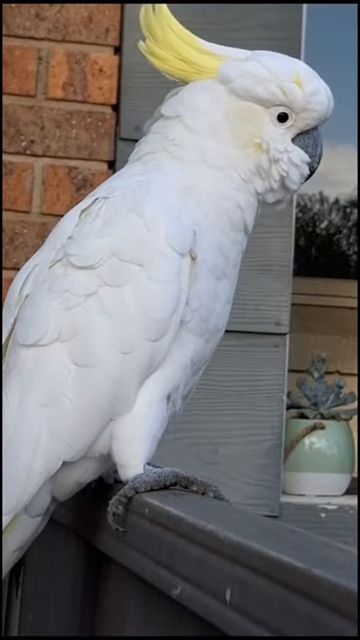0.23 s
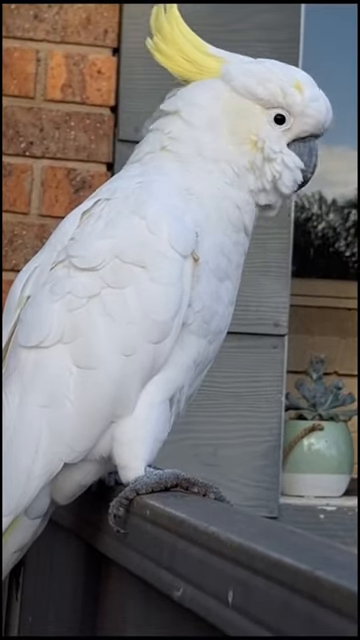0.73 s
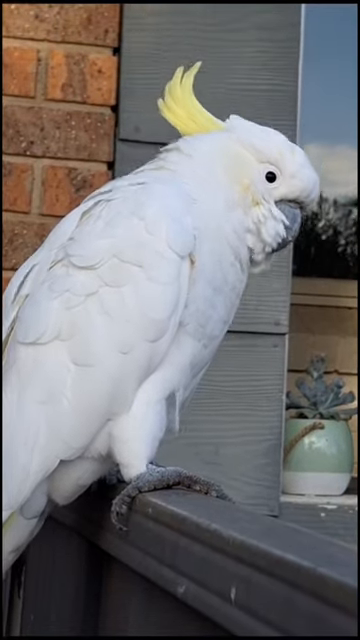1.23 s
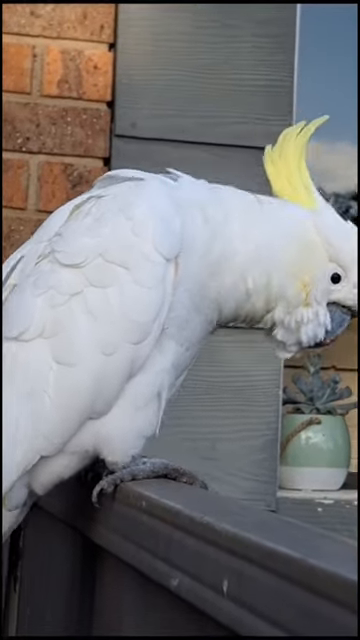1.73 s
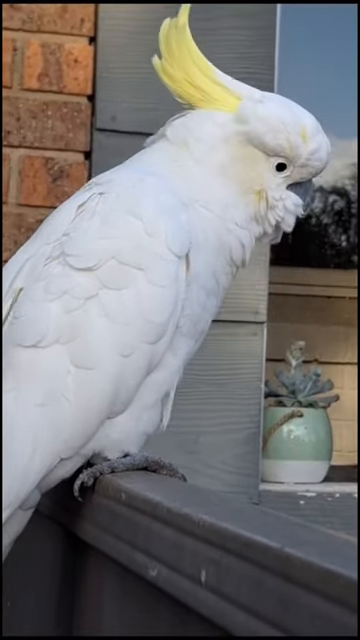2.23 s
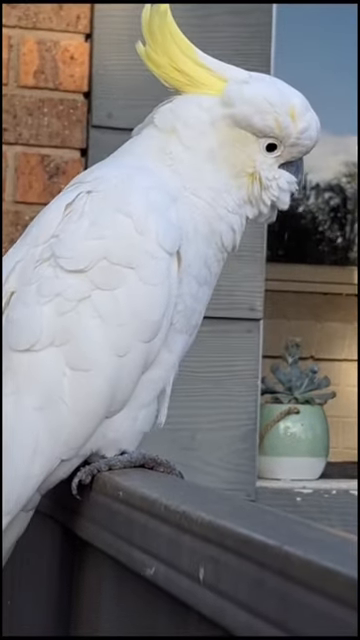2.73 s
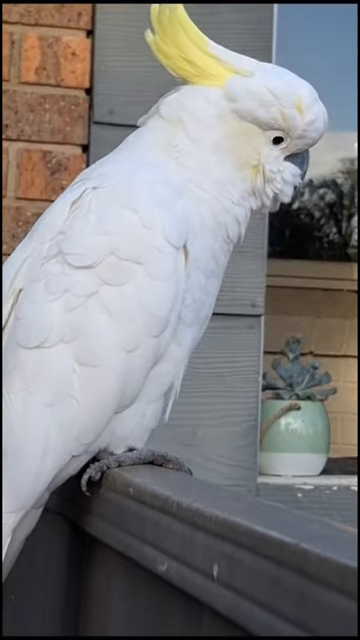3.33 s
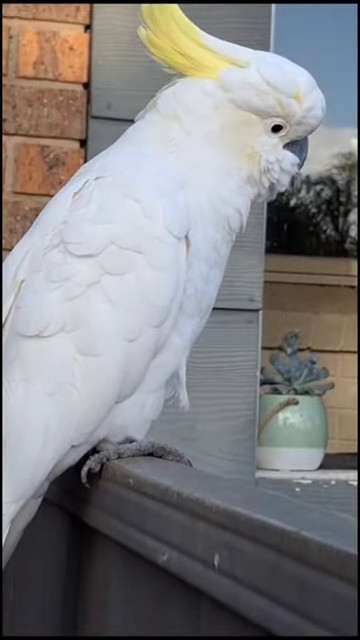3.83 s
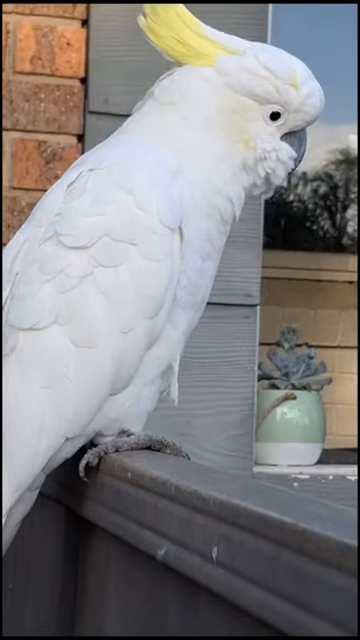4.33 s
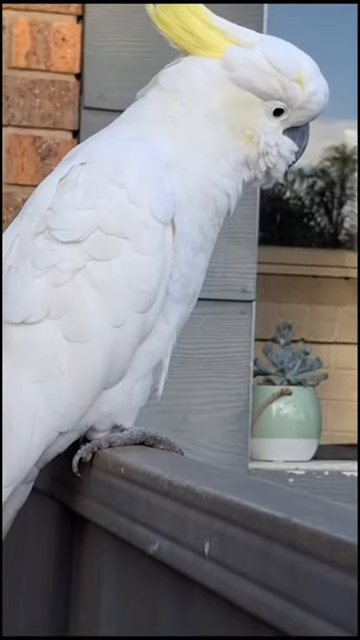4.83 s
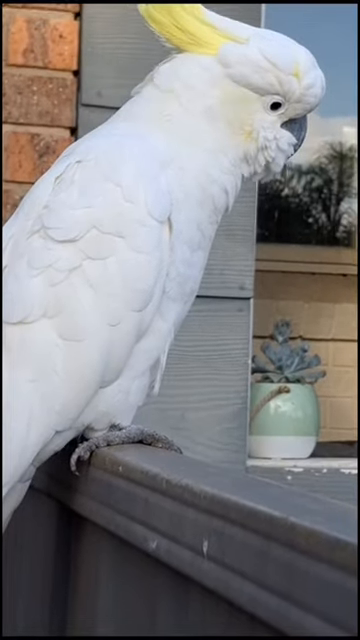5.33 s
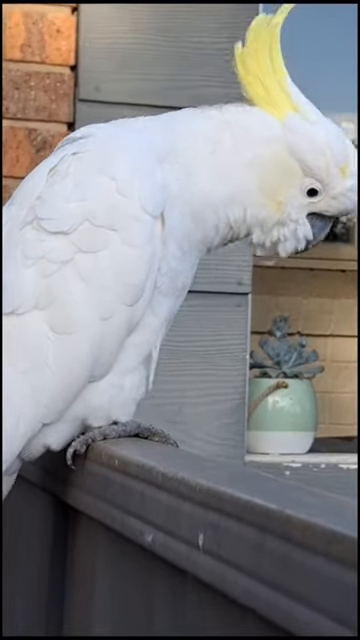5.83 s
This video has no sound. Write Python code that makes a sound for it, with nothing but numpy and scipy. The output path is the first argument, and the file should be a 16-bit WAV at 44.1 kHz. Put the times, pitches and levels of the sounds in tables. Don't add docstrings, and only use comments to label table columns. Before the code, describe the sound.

A cockatoo close by on a railing gives a faint crackling croak and a soft hoarse rasp. After a pause come two short loud calls: a harsh creak, then a clearer squawk that arches up and down. Soft low rail thumps and feather rubs accompany it. Behind are a quiet rumble, far traffic, hissing leaves, a faint motor drone and tiny bird chirps. Close stereo pickup outdoors, with only a brief reflection from the wall.

```python
import sys
import numpy as np
from scipy import signal
from scipy.fft import rfft, irfft, next_fast_len
from scipy.io import wavfile
from scipy.ndimage import uniform_filter1d, map_coordinates

SR = 44100
rng = np.random.default_rng(int(sys.argv[2]) if len(sys.argv) > 2 else 0)


def unload_wav(signal):
    wavfile.write(
        sys.argv[1],
        SR,
        np.round(np.clip(np.atleast_2d(signal).T, -1, 1) * 32767).astype(np.int16),
    )


def attenuation_scalar(level_db):
    decades = np.asarray(level_db, float) / 20
    return 10 ** decades


N = 268701
TIME = np.arange(N) / SR

# frequency in Hz, density in dB per Hz.
RUMBLE_SPECTRUM = [(12, -47.5), (20, -17), (35, -8.5), (65, 1), (85, 1), (156, -15), (200, -11.5),
                   (260, -36), (440, -120)]
# frequency in Hz, density in dB per Hz.
TRAFFIC_SPECTRUM = [(71, -35), (120, -4.5), (157, -8), (260, -3), (412, -9.5), (456, -11), (849, -15),
                    (1140, -17.5), (2500, -24.5), (3250, -57), (5500, -120)]
# frequency in Hz, density in dB per Hz.
LEAF_SPECTRUM = [(710, -34.5), (1200, -10), (1630, -6.5), (2420, -3), (3160, -2.5), (4940, -1), (5800, -4),
                 (7810, -2.5), (8970, -6.5), (12300, -7), (15300, -13)]
# frequency in Hz, left-right likeness 0-1.
COHERENCE = [(40, 0.5), (120, 0.76), (300, 0.97), (1000, 0.86), (3000, 0.188), (8000, 0.036)]
# time in seconds, rise in dB.
RUMBLE_SWELLS = [(0, 5), (.54, -0.5), (.85, 7), (1.27, 8), (1.58, 6), (2.3, 8), (2.7, 6), (2.95, 6.5),
                 (3.66, 4.5), (4.06, 2.5), (4.46, 4.5), (4.95, 3.5), (5.3, 6), (5.55, 2), (6.03, 12.5)]
# time in seconds, level in dB, left-right difference in dB.
TRAFFIC_PASSING = [(0, -61.5, 1.5), (.75, -63.5, 2.5), (1.4, -56, 1), (2.0, -61.5, 2), (2.4, -58.5, 0),
                   (3.2, -59, -3.5), (3.8, -59.5, -1), (4.9, -62.5, 0.5), (6.09, -62.5, 0)]
# time in seconds, strength in dB.
BREEZE_STRENGTH = [(0.0, -63), (0.29, -61.5), (0.54, -60.5), (0.95, -58.5), (1.08, -57.5), (1.61, -55),
                   (1.95, -57.5), (3.26, -56), (3.49, -58), (4.34, -62.5), (6.09, -62.5)]
# centre in seconds, length in seconds, start in Hz, end in Hz, level in dB.
FAR_CHIRPS = [(1.048, 0.076, 2350, 2250, -69.5), (2.432, 0.035, 2490, 2450, -62),
              (2.536, 0.037, 2500, 2446, -61), (3.22, 0.049, 3000, 3000, -58),
              (4.111, .12, 2390, 2700, -67.5), (4.303, .067, 3150, 3060, -65), (4.37, .04, 3180, 3000, -61),
              (4.384, 0.1, 3890, 4000, -66), (4.46, 0.067, 4200, 4120, -67),
              (4.497, .069, 3300, 3060, -62.5), (4.508, 0.056, 4000, 3780, -66),
              (4.542, 0.084, 2800, 2800, -66.5), (4.696, 0.029, 3900, 3970, -58),
              (5.18, .03, 3620, 3630, -68.5), (5.43, .03, 2800, 2800, -65), (5.829, .04, 3950, 3880, -67),
              (5.861, 0.033, 5300, 5500, -59), (5.869, 0.02, 4350, 4200, -52),
              (5.913, .03, 4150, 4050, -54), (6.008, .04, 4170, 4250, -66)]
# start in seconds, end in seconds, start in Hz, end in Hz, level in dB.
MOTOR_LINES = [
    (2.03, 2.203, 268, 260, -58),
    (2.156, 2.272, 210, 228, -50.5),
    (2.257, 2.75, 230, 237, -55.5),
    (2.79, 3.028, 242, 246.5, -50.5),
    (2.323, 2.574, 319, 324.4, -55),
    (2.717, 2.974, 332, 341, -57),
    (4.655, 4.837, 271.6, 226, -54.5),
    (4.925, 5.47, 252, 258.8, -60.5),
    (5.123, 5.71, 206.5, 208.8, -57),
]
# centre in seconds, length in seconds, resonance in Hz, width in Hz,
# level in dB.
BRUSH_STROKES = [
    (1.07, 0.035, 540, 1000, -55.5),
    (1.274, 0.065, 304, 260, -47.5),
    (1.86, 0.14, 1450, 1500, -60),
    (3.709, 0.047, 600, 700, -48),
    (4.053, 0.074, 2060, 2100, -57),
    (4.712, 0.11, 3500, 6600, -57.5),
    (5.933, 0.088, 2150, 4320, -56),
]
# start in seconds, peak in dB, frequency in Hz, left-right difference in dB.
RAIL_KNOCKS = [
    (0.297, -46, 67.4, -8),
    (0.881, -39, 57, 3),
    (1.169, -43, 55.7, 3),
    (1.207, -34.5, 61.9, 2),
    (1.27, -36, 52, -2),
    (2.279, -38, 67.3, 0),
    (3.693, -34, 136, 1),
    (3.734, -34.5, 80, 1.5),
    (6.03, -38, 70, 0),
]

# time in seconds, peak in dB.
CROAK_SNAPS = [
    (1.233, -39),
    (1.2415, -32),
    (1.2485, -32),
    (1.2555, -26),
    (1.2645, -25.5),
    (1.268, -30),
    (1.2745, -26),
    (1.283, -25),
    (1.2905, -30.5),
    (1.2985, -34),
]
# time in seconds, peak in dB.
CREAK_SNAPS = [(2.9905, -30), (2.9997, -18), (3.0086, -17), (3.0177, -12), (3.0272, -8.5), (3.0424, -11),
               (3.0454, -9), (3.0574, -7), (3.0654, -8.5), (3.0726, -7), (3.0924, -8.5), (3.1015, -12)]
# time in seconds, level in dB, beak opening 0-1.
RASP_COURSE = [
    (1.383, -46, 1),
    (1.41, -37, 0.23),
    (1.445, -35, 0.64),
    (1.475, -32, 0.87),
    (1.52, -34, 0.55),
    (1.55, -35.5, 0.52),
    (1.582, -48, 0.5),
]
# time in seconds, pitch in Hz, level in dB, beak opening 0-1.
ARCH_COURSE = [
    (3.22, 434, -23, 0.4),
    (3.245, 462, -19, 1),
    (3.289, 544, -20.5, 0.38),
    (3.307, 623, -26, 0.87),
    (3.33, 690.6, -25.5, 0.1),
    (3.371, 561, -21, 0.65),
    (3.39, 425.4, -20, 1),
    (3.403, 319, -22.5, 1),
    (3.421, 288, -31, 1),
]
# frequency in Hz, width in Hz, gain in dB.
CROAK_MODES = [(450, 87, -16), (890, 110, -2.5), (1396, 44, -1), (2230, 360, 0.5), (2700, 490, -3),
               (3300, 260, -7)]
# frequency in Hz, width in Hz, gain in dB.
CREAK_MODES = [(664, 260, -11), (1330, 230, -14.5), (2250, 170, 3.5), (3500, 370, -8), (4250, 370, -13)]
# frequency in Hz, width in Hz, gain in dB.
RASP_SHUT_MODES = [(900, 490, -10.5), (1530, 170, -9), (2205, 38, 8.5), (2800, 330, -9)]
# frequency in Hz, width in Hz, gain in dB.
RASP_OPEN_MODES = [(1340, 370, -11), (1890, 130, -3.5), (2380, 150, -6), (2800, 150, -5.5),
                   (3020, 630, -10.5)]
# frequency in Hz, width in Hz, gain in dB.
ARCH_SHUT_MODES = [(1190, 860, -9), (1926, 204, 5), (2700, 1600, -10.5), (3890, 640, -6)]
# frequency in Hz, width in Hz, gain in dB.
ARCH_OPEN_MODES = [(815, 350, -11), (1570, 150, -8.5), (2140, 243, 3), (3300, 1500, -9.5),
                   (4200, 320, -10.5)]
# frequency in Hz, left-right difference in dB.
BIRD_PAN = [(300, -0.5), (700, -2), (1280, 0), (2360, -4.5), (4360, -2)]
# frequency in Hz, lead of the left port in seconds.
BIRD_LEAD = [(600, 0.00011), (1400, 0.00009), (2300, 0.000066), (4400, 0.000063)]
# frequency in Hz, time to fall 60 dB in seconds.
WALL_DECAY = [(200, 0.2), (2000, 0.19), (6000, 0.034)]


def unit(x):
    return x / np.sqrt(np.mean(x ** 2) + 1e-20)


def along(points, hz):
    f, v = np.transpose(points)
    return np.interp(np.log(hz + 1), np.log(f + 1), v)


def curves(rows):
    s, *columns = np.transpose(rows)
    gate = uniform_filter1d(1. * (TIME > s[0]) * (TIME < s[-1]), size=200)
    return [np.interp(TIME, s, column) for column in columns], gate


def wobble(rate):
    knots = rng.standard_normal(int(N * rate / SR) + 4)
    return map_coordinates(knots, [TIME * rate])


def ramp(start, end, attack, release):
    rise = np.minimum((TIME - start) / attack, (end - TIME) / release)
    return np.sin(np.pi / 2 * np.clip(rise, 0, 1)) ** 2


def filtered(x, response):
    m = next_fast_len(N + SR // 2)
    return irfft(rfft(x, m) * response(np.fft.rfftfreq(m, 1 / SR)), m)[..., :N]


def tone(hz):
    return np.sqrt(2) * np.sin(2 * np.pi * np.cumsum(hz) / SR)


def rush(spectrum, patchy_db, lead_s):
    z = signal.stft(rng.standard_normal((2, N)), nperseg=512)[2]
    patches = uniform_filter1d(rng.standard_normal(z.shape[1:]), size=6, axis=0)
    patches = uniform_filter1d(patches, size=10, axis=1)
    pair = signal.istft(z * attenuation_scalar(patchy_db * unit(patches)), nperseg=512)[1][:, :N]

    def mid_side(hz):
        angle = np.arccos(np.clip(along(COHERENCE, hz), -1, 1)) / 2
        return attenuation_scalar(along(spectrum, hz)) * [np.cos(angle), np.sin(angle)]

    mid, side = filtered(pair, mid_side)
    stereo = np.array([mid + side, mid - side])
    return unit(filtered(stereo, lambda hz: np.exp(1j * np.pi * lead_s * np.array([hz, -hz]))))


def yard():
    (traffic_db, pan_db), _ = curves(TRAFFIC_PASSING)
    (leaves_db,), _ = curves(BREEZE_STRENGTH)
    swell_s = 0.098
    rumble_db = -59.5 + sum(db * np.exp(-((TIME - s) / swell_s) ** 2) for s, db in RUMBLE_SWELLS)
    gust = np.tanh(wobble(7.7))
    rumble_gain = attenuation_scalar(rumble_db + 4.0 + 1.94 * wobble(13))
    rumble = rumble_gain * rush(RUMBLE_SPECTRUM, patchy_db=2, lead_s=0.00019)
    traffic_gain = attenuation_scalar(traffic_db + 7.5 + 0.546 * wobble(10.0) + 0.1 * gust)
    traffic = traffic_gain * rush(TRAFFIC_SPECTRUM, patchy_db=2.04, lead_s=0.00018)
    flutter_db = 0.6 * gust + 0.8 * wobble(14)
    leaves = attenuation_scalar(leaves_db + 5.0 + flutter_db) * rush(LEAF_SPECTRUM, patchy_db=1.56, lead_s=0.0002)
    pan = attenuation_scalar(np.clip([pan_db, -pan_db], -5, 5) / 2)
    return (rumble + traffic) * pan + leaves * attenuation_scalar([[-0.4], [0.4]])


def drone():
    out, fade_s = np.zeros(N), 0.046
    for start, end, start_hz, end_hz, db in MOTOR_LINES:
        gain = ramp(start, end, fade_s, fade_s) * attenuation_scalar(db + 1.2 * wobble(12))
        hz = np.interp(TIME, [start, end], [start_hz, end_hz])
        out += gain * tone(hz * (1 + 0.0057 * wobble(25.48)))
    return out


def small_birds():
    song = np.zeros(N)
    for s, length, start_hz, end_hz, db in FAR_CHIRPS:
        hz = np.interp(TIME, [s - length / 2, s + length / 2], [start_hz, end_hz])
        hz = hz * (1 + 0.02 * wobble(200))
        song += attenuation_scalar(db + 4.2 * wobble(120)) * np.exp(-(2 * (TIME - s) / length) ** 2) * tone(hz)
    t60_s = 0.25
    echo = rng.standard_normal((2, SR // 4)) * attenuation_scalar(-60 * np.arange(SR // 4) / SR / t60_s)
    echo = echo / np.linalg.norm(echo[0])
    smeared = signal.fftconvolve(song[None], echo, axes=1)[:, :N]
    return song * attenuation_scalar([[1.5], [-1.5]]) + attenuation_scalar(-2.5) * smeared


def brushes():
    out = np.zeros((2, N))
    for s, length, hz, width, db in BRUSH_STROKES:
        grain = rng.standard_normal((2, N)) * attenuation_scalar(1.9 * wobble(280))
        grain[1] = 0.48 * grain[0] + 1.12 * grain[1]
        band = unit(filtered(grain, lambda f: (1j * f * width / (hz * hz - f * f + 1j * f * width)) ** 2))
        out += attenuation_scalar(db) * band * np.exp(-(2 * (TIME - s) / length) ** 4)
    return out


def knocks():
    out = np.zeros((2, N))
    for s, db, hz, pan_db in RAIL_KNOCKS:
        turns = np.clip(TIME - s, 0, None) * hz
        push = np.sin(2 * np.pi * turns) * turns * np.exp(-2.2 * turns)
        out += attenuation_scalar(db + 14 + np.array([[pan_db], [-pan_db]]) / 2) * push
    return out


def pulses(times, sizes):
    at = times[:, None] * SR
    index = at.astype(int) + np.arange(-8, 9)
    shape = np.sinc(index - at) * np.cos(np.pi * (index - at) / 18) ** 2
    return np.bincount(index.ravel(), (sizes[:, None] * shape).ravel(), N)[:N]


def throat(x, modes, low_hz, top_hz):
    top_cut = signal.butter(10, top_hz, fs=SR, output="sos")
    bass_cut = signal.butter(2, low_hz, "high", fs=SR, output="sos")

    def resonances(f):
        total = 0
        for k, (hz, width, db) in enumerate(modes):
            total = total + (-1) ** k * attenuation_scalar(db) * 1j * f * width / (hz * hz - f * f + 1j * f * width)
        return total

    return signal.sosfilt(np.vstack([top_cut, bass_cut]), filtered(x, resonances))


def beak(x, shut, wide, opening, low_hz, top_hz):
    share = np.clip(opening, 0, 1)
    return (1 - share) * throat(x, shut, low_hz, top_hz) + share * throat(x, wide, low_hz, top_hz)


def voiced(hz, rough, gate, jitter, scatter_db):
    cycles = np.cumsum(hz * gate) / SR
    at = np.interp(np.arange(1, int(cycles[-1])), cycles, TIME)
    k = (at * SR).astype(int)
    chance = rng.standard_normal((len(at), 2))
    times = at + jitter * rough[k] * chance[:, 0] / hz[k]
    sizes = attenuation_scalar(scatter_db * rough[k] * chance[:, 1]) * np.sqrt(SR / hz[k])
    air = rng.standard_normal(N) * np.exp(-3 * (cycles % 1)) * gate
    return pulses(times, sizes) + 1.5 * rough * air


def level(x, gate):
    slow = uniform_filter1d(uniform_filter1d(x ** 2, size=500), size=500)
    return gate * x / np.sqrt(np.abs(slow) + 0.0096 * slow.max())


def creak(snaps, pitch_hz, fade_db, air, modes, gain_db, top_hz):
    s, db = np.transpose(snaps)
    step = np.arange(8)
    unevenness = 1 + 0.015 * rng.standard_normal((len(s), 8))
    at = s[:, None] + step / pitch_hz(s)[:, None] * unevenness
    next_snap = np.append(s[1:], s[-1] + 0.005)[:, None]
    alive = (step == 0) | (at < next_snap - 0.002)
    loss_db = np.cumsum(fade_db(at) * (step > 0), axis=1)
    scatter_db = 0.7 * rng.standard_normal(at.shape) * (step > 0)
    size = attenuation_scalar(db[:, None] + gain_db - loss_db + scatter_db)
    train = pulses(at[alive], size[alive])
    puff = np.convolve(train, attenuation_scalar(-60 * np.arange(500) / SR / 0.012))[:N] * rng.standard_normal(N)
    return throat(train + air * puff, modes, low_hz=353, top_hz=top_hz)


def croak():
    hiss = throat(rng.standard_normal(N), [(4850, 760, 0)], low_hz=3000, top_hz=6940)
    hiss = hiss * np.exp(-((TIME - 1.27) / 0.02) ** 2)
    snaps = creak(CROAK_SNAPS, lambda s: 260 + 0 * s, lambda s: 10 + 0 * s, air=0.16,
                  modes=CROAK_MODES, gain_db=26, top_hz=3600)
    return snaps + attenuation_scalar(-31.5) * hiss


def rasp():
    (db, opening), gate = curves(RASP_COURSE)
    effort_db = db + 35
    hz = 888 + 8 * effort_db
    chaos = voiced(hz / 2, 0.9 + 0 * hz, gate, jitter=0.3, scatter_db=3.5)
    whistle_db = -39.5 + effort_db / 2 - 9 * opening + 3 * wobble(110)
    whistle = attenuation_scalar(whistle_db) * tone(hz * (1 + 0.05 * wobble(250) + 0.025 * wobble(40)))
    shaped = beak(chaos, RASP_SHUT_MODES, RASP_OPEN_MODES, opening, low_hz=600, top_hz=3650)
    uneven_db = 0.6 * wobble(60) + 1.5 * wobble(180)
    return attenuation_scalar(db + uneven_db) * level(shaped, gate) + gate * whistle


def creaky_call():
    start, end = CREAK_SNAPS[0][0], CREAK_SNAPS[-1][0]
    start_hz, rest_hz, sag_s = 345, 243, 0.024
    full_s, tired_s = 3.044, 3.083

    def pitch(s):
        return rest_hz + (start_hz - rest_hz) * np.exp(-np.clip(s - start, 0, None) / sag_s)

    def fade(s):
        return np.select([s > tired_s, s > full_s], [12, 1.8], 3)

    flutter = creak(CREAK_SNAPS, pitch, fade, air=0.035, modes=CREAK_MODES, gain_db=28.0, top_hz=4350)
    low = attenuation_scalar(-38.5 + 2.1 * wobble(110)) * tone(pitch(TIME) * (1 + 0.03 * wobble(120)))
    parting_s = 0.0012
    tick = throat(rng.standard_normal(N), [(3100, 900, 0)], low_hz=1500, top_hz=4600)
    tick = tick * np.exp(-((TIME - start - parting_s) / parting_s) ** 2)
    return flutter + attenuation_scalar(-20) * tick + ramp(start, end, 0.012, 0.012) * low


def arched_call():
    (hz, db, opening), gate = curves(ARCH_COURSE)
    start, end = ARCH_COURSE[0][0], ARCH_COURSE[-1][0]
    full_hz, top_s = 632, 3.305
    low_db = db - 1 + 46 * np.minimum(np.log2(hz / full_hz), 0)
    low_db = low_db - 120 * np.clip(TIME - top_s, 0, None)
    onset_rough = 0.55 * np.exp(-np.abs(TIME - start) / 0.014)
    break_rough = 0.32 * np.exp(-((TIME - 3.308) / 0.018) ** 2)
    rough = 0.12 + onset_rough + break_rough
    hz = hz * (1 + 0.0035 * wobble(70))
    stream = voiced(hz, rough, gate, jitter=0.1, scatter_db=5)
    shaped = beak(stream, ARCH_SHUT_MODES, ARCH_OPEN_MODES, opening, low_hz=646, top_hz=4820)
    low = attenuation_scalar(low_db) * (tone(hz) + attenuation_scalar(-5) * tone(2 * hz))
    return ramp(start, end, attack=0.015, release=0.0077) * (attenuation_scalar(db) * level(shaped, gate) + low)


def placed(x, wet_db):
    def half_difference(hz):
        return along(BIRD_PAN, hz) * np.log(10) / 40 + 1j * np.pi * along(BIRD_LEAD, hz) * hz

    direct = filtered(x, lambda hz: np.exp([half_difference(hz), -half_difference(hz)]))
    hz, t, z = signal.stft(rng.standard_normal((2, SR // 4)), SR, nperseg=256)
    tail = signal.istft(z * attenuation_scalar(-60 * t / along(WALL_DECAY, hz)[:, None]), SR, nperseg=256)[1]
    tail = tail / np.linalg.norm(tail[0])
    delayed = np.pad(x, (150, 0))[None]
    return direct + attenuation_scalar(wet_db) * signal.fftconvolve(delayed, tail, axes=1)[:, :N]


def scene():
    bird = croak() + rasp() + creaky_call() + arched_call()
    return placed(bird, wet_db=-23) + yard() + brushes() + drone() + knocks() + small_birds()


def low_pass(x):
    return signal.sosfilt(signal.butter(12, 15420, fs=SR, output="sos"), x)


def record(dry):
    return low_pass(dry)


dry = scene()
out = record(dry)
unload_wav(out)
```